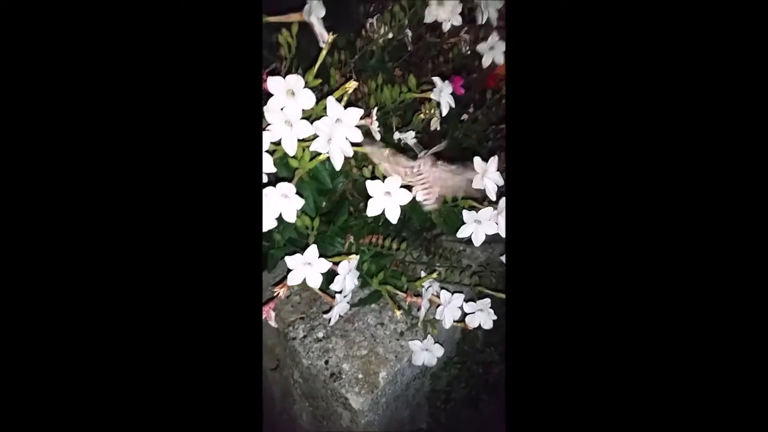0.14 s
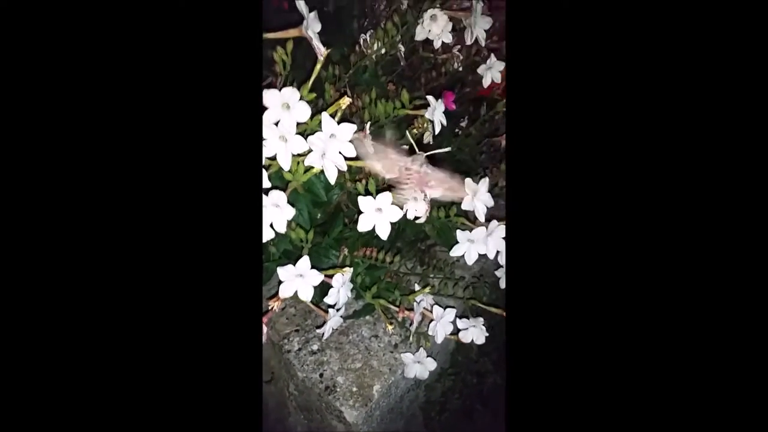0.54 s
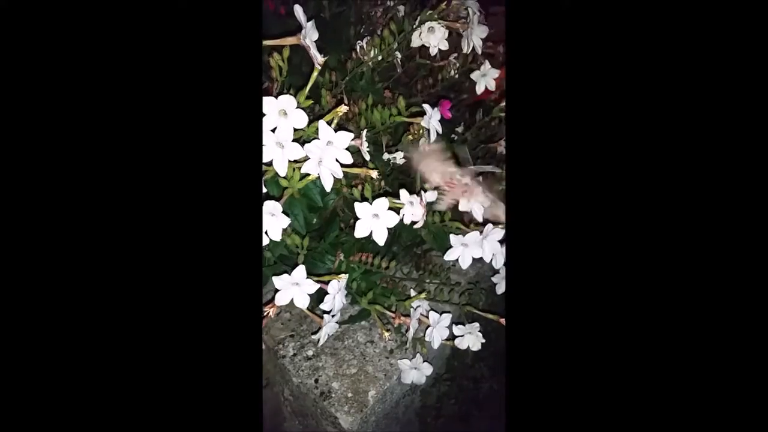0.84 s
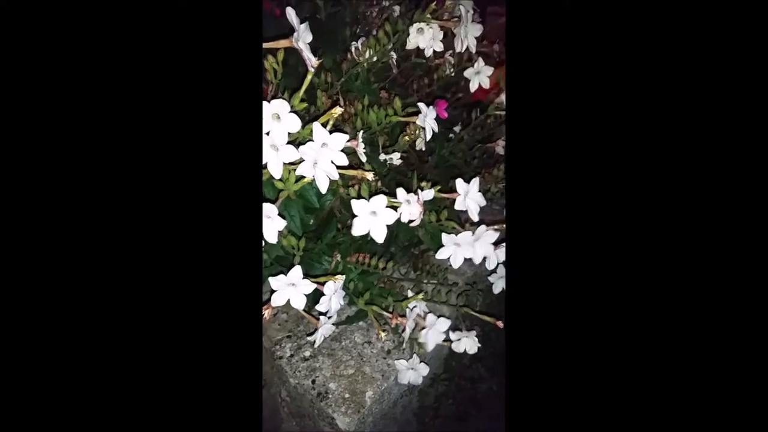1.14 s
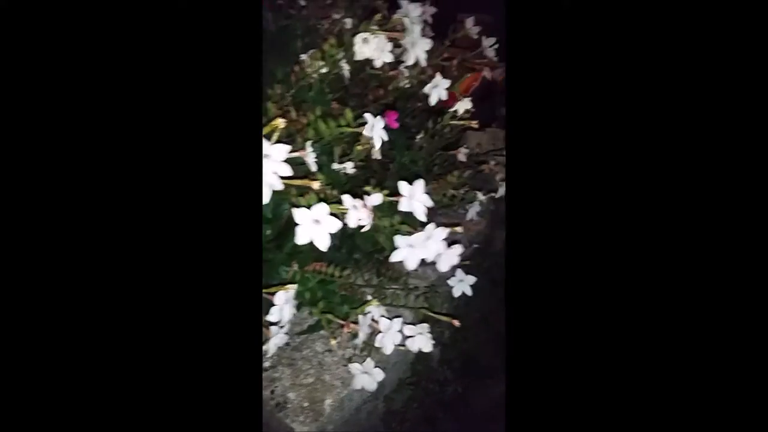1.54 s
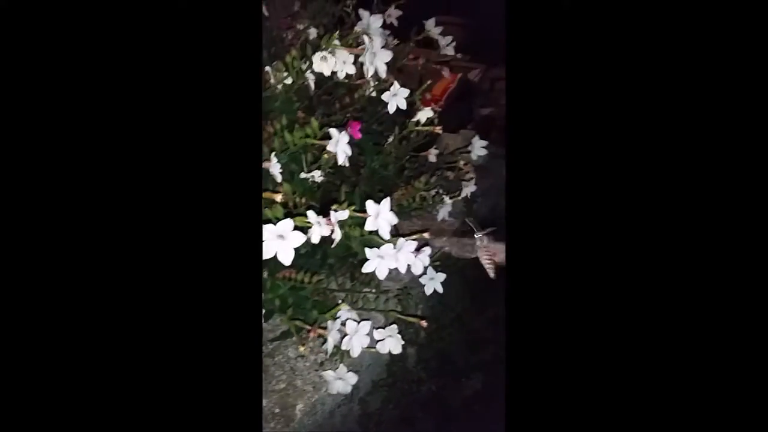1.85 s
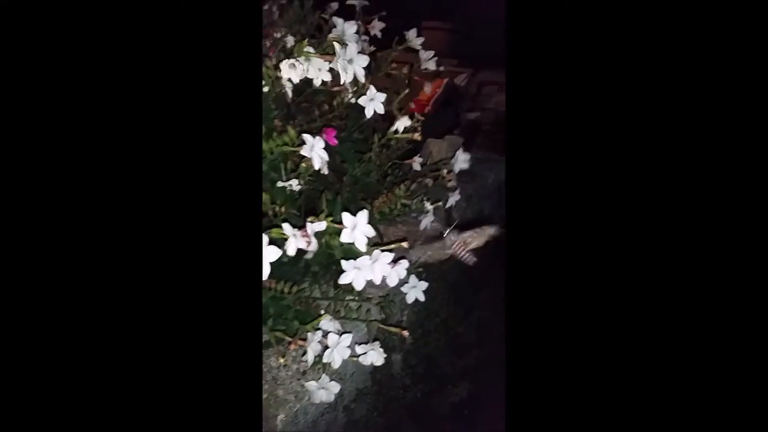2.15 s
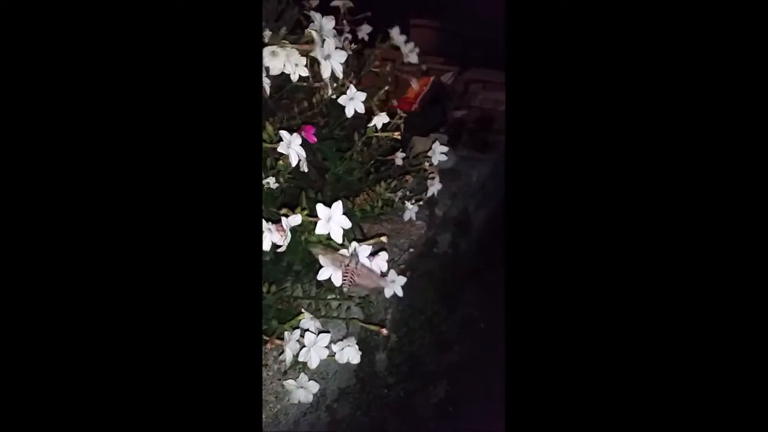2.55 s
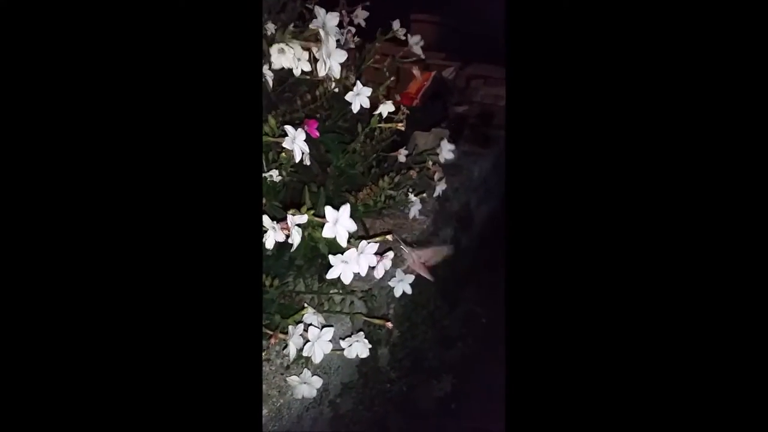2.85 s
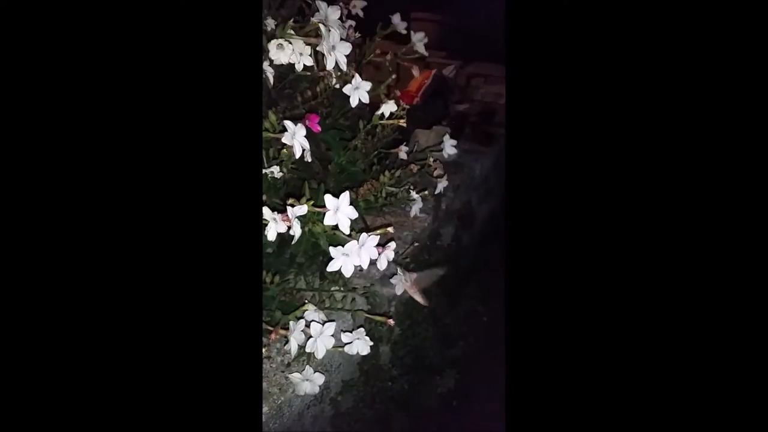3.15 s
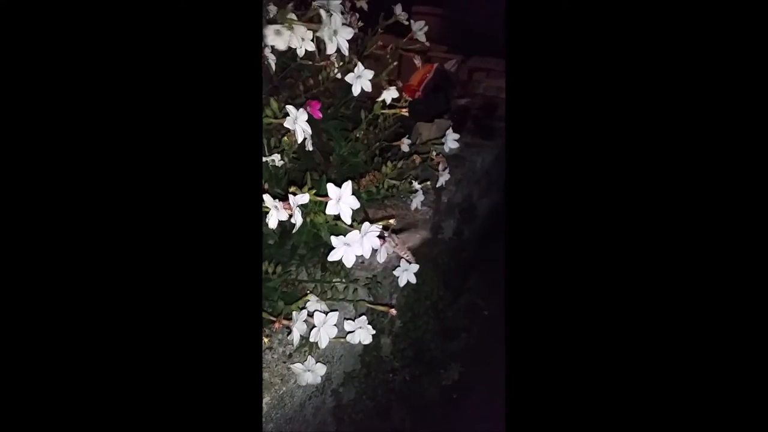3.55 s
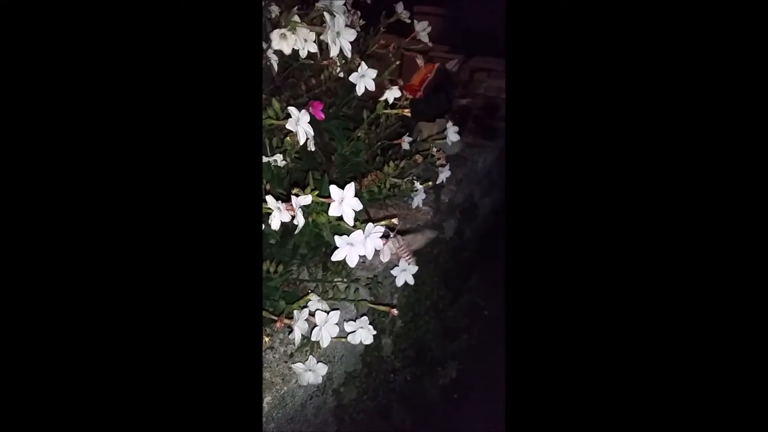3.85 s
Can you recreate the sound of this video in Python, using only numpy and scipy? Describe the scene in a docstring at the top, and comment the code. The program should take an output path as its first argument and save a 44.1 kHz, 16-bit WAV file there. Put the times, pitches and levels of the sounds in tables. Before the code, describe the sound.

Wind buffets an outdoor microphone, mainly on the left: soft low puffs and fluttering rumble until about 1.4 s, then heavy muffled thumps to 2.5 s, a brief lull, and more from 3.1 s to the end. Faint two-part bush-cricket rasps pulse about six times a second, with thin high lisps on the left. A small dry click falls right at 0.58 s. Distant crickets and night air stay very quiet.

```python
"""Light air buffets a microphone in a flower bed at night: low puffs of noise and sharp slaps, mostly at
its left port, over a fluttering draught. Bush crickets rasp two-syllable chirps near 11 kHz and another
insect lisps higher up on the left, both as file teeth ticking into a wing resonance. One small dry click
of short noise bursts falls on the right. Far off, shaped noise gives a steady cricket chorus near 4 kHz,
a band of distant rasping and the soft night air."""
import sys
import numpy as np
from scipy import signal
from scipy.fft import rfft, irfft, next_fast_len
from scipy.io import wavfile
from scipy.ndimage import map_coordinates

SR = 44100
rng = np.random.default_rng(int(sys.argv[2]) if len(sys.argv) > 2 else 0)


def generate_wav(signal):
    """Clip the signal to [-1, 1] and save it as 16-bit WAV at the path in sys.argv[1]."""
    frames = np.transpose(np.atleast_2d(signal))
    scaled = np.clip(frames, -1, 1) * 32767
    pcm = np.round(scaled).astype(np.int16)
    wavfile.write(sys.argv[1], SR, pcm)


N = 176400
T = np.arange(N) / SR


def amp(db):
    """Decibels to linear gain."""
    return 10 ** (np.asarray(db) / 20)


def unit(x):
    """x scaled to an RMS of 1 along its last axis."""
    return x / np.sqrt(np.mean(x ** 2, axis=-1, keepdims=True) + 1e-30)


def along(points, hz):
    """Values read from (frequency, value) points on a log frequency axis."""
    point_hz, value = np.transpose(points)
    return np.interp(np.log(hz + 1), np.log(point_hz + 1), value)


def filtered(x, response):
    """x through a zero-phase filter given as a gain for each frequency."""
    n = x.shape[-1]
    padded = next_fast_len(n + n // 2)
    gain = response(np.fft.rfftfreq(padded, 1 / SR))
    return irfft(rfft(x, padded) * gain, padded)[..., :n]


def coloured(x, spectrum):
    """x through a spectrum of (freq_hz, level_db) points."""
    return filtered(x, lambda hz: amp(along(spectrum, hz)))


def wobble(rate):
    """A smooth random curve for each channel, with rate knots a second."""
    return np.array([map_coordinates(knots, [T * rate]) for knots in rng.standard_normal((2, 1024))])


def pan(db):
    """Left and right gains of mean power 1, db being left minus right."""
    return unit(amp([db / 2, -db / 2]))[:, None]


def around():
    """A short time axis centred on an event, in seconds."""
    return np.arange(-4096, 4096) / SR


def sized(x, db, length):
    """x with the energy of a tone of that amplitude and length."""
    return x * amp(db) * np.sqrt(length * SR / 2 / (np.sum(x ** 2) + 1e-30))


def add(out, x, s):
    """Mix x into out, centred at time s."""
    first = round(s * SR) - x.shape[-1] // 2
    a, b = max(first, 0), min(first + x.shape[-1], N)
    if b > a:
        out[..., a:b] += x[..., a - first:b - first]


# Puffs of air at each port of the microphone: start_s, length_s, level_db, cutoff_hz
LEFT_PUFFS = [(.173, .051, -21, 90.6), (.265, .038, -15.5, 157), (.312, .02, -20, 89),
              (.435, .025, -17, 127), (.504, .021, -18, 95), (.536, .066, -20, 124),
              (.615, .013, -16, 96.4), (.728, .026, -20, 94.5), (.95, .035, -23.5, 79.5),
              (1.285, .017, -18, 126), (1.435, 0.0641, -12.5, 97), (1.568, .065, -14, 130),
              (1.668, .03, -13, 145), (1.76, .085, -19.5, 102.5), (1.93, .044, -17, 159),
              (2.085, .037, -11.5, 127), (2.205, .055, -16, 152), (2.286, .045, -9.5, 142),
              (2.55, .09, -17.5, 89), (2.87, .026, -15.5, 96), (3.455, .015, -13.5, 134.4),
              (3.512, .055, -13.5, 158), (3.596, .062, -11.5, 139), (3.69, .03, -15.5, 150.7),
              (3.958, .03, -21, 173)]
RIGHT_PUFFS = [(.771, 0.034, -29, 108), (3.315, 0.029, -22, 173), (3.371, 0.031, -24, 179),
               (3.442, 0.016, -23.5, 174), (3.513, 0.043, -29, 175), (3.652, 0.025, -19.5, 229)]
PUFF_LOW_HZ, PUFF_TOP_HZ = 51.6, 750  # low cut in puffs, upper limit of the turbulence in puffs and wisps
PUFF_STEEP = 3.6  # order of the roll-off above cutoff_hz
PUFF_EDGE_S = 0.0055  # softness of a puff's start and end
PUFF_SPREAD = 1.21  # energy is reckoned over this multiple of the length


def puffs(rows):
    """Each eddy shoves one port with a few cycles of low turbulence."""
    out, t = np.zeros(N), around()
    for start_s, length_s, level_db, cutoff_hz in rows:
        gate = .5 + .5 * np.tanh((length_s / 2 - abs(t)) / PUFF_EDGE_S)

        def port(hz):
            low_cut = hz ** 4 + PUFF_LOW_HZ ** 4
            high_cut = 1 + (hz / cutoff_hz) ** (2 * PUFF_STEEP)
            return hz ** 2 / np.sqrt(low_cut * high_cut) * np.exp(-(hz / PUFF_TOP_HZ) ** 2)

        push = gate * filtered(rng.standard_normal(len(t)), port)
        add(out, sized(push, level_db, length_s * PUFF_SPREAD), start_s + length_s / 2)
    return out


# Sharp slaps of air at each port: time_s, level_db (peak of the push), cutoff_hz
LEFT_SLAPS = [(1.435, -7, 83.5), (1.475, -10, 127), (1.586, -3.5, 127.4), (1.641, -5.5, 150),
              (1.655, -13, 155), (1.704, -5, 153), (1.768, -12, 92.6), (1.923, -3.5, 105),
              (2.077, -5.5, 125), (2.235, -1.5, 160), (2.304, -6, 196), (2.327, -6.5, 120),
              (2.351, -8, 245), (2.53, -6, 80), (3.126, -6, 175), (3.3, -6, 88), (3.427, -15.5, 195),
              (3.511, -6, 145.3), (3.608, -7, 175), (3.621, -17, 290), (3.644, -7, 135),
              (3.969, -10.5, 175), (3.985, -7.5, 144)]
RIGHT_SLAPS = [(.046, -18.5, 292), (1.452, -21, 290), (3.303, -27.5, 403)]
SLAP_STEEP, PORT_LOW_HZ = 1.31, 64  # roll-off exponent, the port's low cut
WISP_SHARE, WISP_S, WISP_HZ = 0.036, 0.01, 330  # share of the push, its life, its colour


def slaps(rows):
    """A small fast eddy pushes once, the port's low cut swings back slower, a wisp of turbulence trails."""
    out, t = np.zeros(N), around()
    low_cut = signal.butter(3, PORT_LOW_HZ, "highpass", fs=SR, output="sos")
    trail = np.exp(-abs(t) / np.where(t < 0, WISP_S / 2, WISP_S))  # rises faster than it dies

    def wisp_colour(hz):
        return hz * np.exp(-2 * hz / WISP_HZ - (hz / PUFF_TOP_HZ) ** 2)

    for time_s, level_db, cutoff_hz in rows:
        impulse = 1. * (t == 0)
        shove = filtered(impulse, lambda hz: np.exp(-(hz / cutoff_hz) ** SLAP_STEEP))
        push = signal.sosfilt(low_cut, shove)
        wisp = unit(filtered(rng.standard_normal(len(t)), wisp_colour))
        add(out, amp(level_db) * (push / abs(push).max() + WISP_SHARE * trail * wisp), time_s)
    return out


# Draught between the puffs: time_s, left_db, right_db
DRAUGHT = [(0, -32, -54), (0.091, -35.5, -48), (0.17, -28.5, -45.5), (0.548, -28.5, -34.5),
           (.68, -30.5, -41), (.86, -37.5, -36), (1.0, -27.5, -50.5), (1.222, -31.5, -28),
           (1.361, -36.5, -44.5), (1.498, -27.5, -30.5), (1.681, -23.5, -41.5), (2.019, -25, -40),
           (2.601, -23.5, -46), (2.799, -34, -47), (3.199, -24.5, -32.5), (3.42, -29, -25.5),
           (3.6, -16.5, -28.5), (3.88, -30, -44)]
# Colour of its small eddies: freq_hz, relative_db (per Hz)
EDDIES = [(15, -8.5), (35, -3), (65, 3.5), (100, 1), (160, -10), (250, -23), (450, -46.5), (900, -52),
          (2500, -100)]


def draught(flutter_db=3, flutter_hz=26):
    """A fluttering low rumble, unrelated from port to port."""
    time_s, *ports = np.transpose(DRAUGHT)
    level_db = np.array([np.interp(T, time_s, port_db) for port_db in ports])
    rumble = coloured(rng.standard_normal((2, N)), EDDIES)
    return amp(level_db) * unit(amp(flutter_db * wobble(flutter_hz)) * rumble)


STROKE_SWELL, STROKE_FADE = 2.4, .7  # exponents: how the force builds and lets go
STROKE_SLOWING, STROKE_CENTRE = .4, .66  # how the wing slows, share of the stroke before its listed time
TOOTH_SCATTER, TOOTH_DB = 0.053, 3.5  # uneven spacing in teeth, uneven strength in dB


def stroke(length, tooth_hz, wing, db):
    """File teeth tick into the wing's resonance, ever harder and slower, then let go."""
    t = around()
    teeth_passed = tooth_hz * length
    scatter, size = rng.standard_normal((2, 128))
    travel = np.clip((np.arange(len(size)) + TOOTH_SCATTER * scatter) / teeth_passed, 0, 1)
    phase = travel * (1 + STROKE_SLOWING * (travel - 1))
    # teeth beyond the end of the stroke get no force
    force = travel ** STROKE_SWELL * (1 - travel) ** STROKE_FADE * amp(TOOTH_DB * size)
    sample = np.searchsorted(t, (phase - STROKE_CENTRE) * length)
    teeth = np.bincount(np.clip(sample, 0, len(t) - 1), force, len(t))
    return sized(coloured(teeth, wing), db, length)


LEAF_SHARE, LEAF_T60_S = .75, 0.033  # scattered over direct sound, decay time by 60 dB


def foliage(x):
    """Leaves scatter a stroke into a short diffuse tail, different at each port."""
    t = around()
    decay = (t >= 0) * amp(-60 * abs(t) / LEAF_T60_S)
    tail = unit(rng.standard_normal((2, len(t))) * decay) / np.sqrt(len(t))
    scattered = signal.fftconvolve(np.array([x, x]), tail, "same", axes=1)
    return (x + LEAF_SHARE * scattered) / np.hypot(1, LEAF_SHARE)


# Bush cricket chirps: time_s, first_syllable_db, second_syllable_db, pan_db (left minus right)
CHIRPS = [(0.012, -62, -53.5, -11), (0.164, -60, -59.5, -7), (0.319, -63.5, -63.5, 7.5),
          (0.482, -59.5, -56, -10.5), (0.623, -63, -57.5, 9), (0.79, -62, -66.5, -4.5),
          (0.942, -56, -58.5, 11), (1.11, -69, -66.5, -1), (1.27, -73, -68, -5),
          (1.437, -66.5, -57.5, -3.5), (1.59, -70, -64.5, -8.5), (1.743, -68, -81, 3),
          (1.905, -66, -60, -15), (2.067, -61.5, -57, -3), (2.226, -66.5, -61, -4.5),
          (2.389, -68, -71.5, -1.5), (2.537, -64, -61, 0.5), (2.698, -59.5, -56, 4), (2.855, -59, -61, -5),
          (3.018, -63, -61.5, -8), (3.178, -63.5, -65.5, -6), (3.318, -63, -58, 9),
          (3.495, -59, -58.5, -12), (3.638, -64, -61, 10.5), (3.79, -73, -68.5, 2), (3.944, -77, -66, 17)]
# Resonance of the bush cricket's wing: freq_hz, relative_db
WING = [(8500, -47.5), (9600, -23.5), (10300, -3.5), (10900, 2.5), (11600, -1), (12200, -23), (13500, -29),
        (16000, -45.5)]
SYLLABLE_GAP_S, SYLLABLE_S = .047, .056  # from one syllable to the next, length of each
TOOTH_HZ, TOOTH_DRIFT = 262, 0.12  # typical tooth rate, log spread of stroke speed


def bush_crickets():
    """Two wing strokes make a chirp; no two run at quite the same speed."""
    out = np.zeros((2, N))
    for time_s, first_db, second_db, pan_db in CHIRPS:
        for k, level_db in enumerate((first_db, second_db)):
            tooth_hz = TOOTH_HZ * np.exp(TOOTH_DRIFT * rng.standard_normal())
            syllable = foliage(stroke(SYLLABLE_S, tooth_hz, WING, level_db))
            add(out, pan(pan_db) * syllable, time_s + k * SYLLABLE_GAP_S)
    return out


# Lisps of a higher insect: time_s, level_db (at the left port)
LISPS = [(0.709, -64), (0.869, -60.5), (1.079, -64), (1.241, -63), (1.842, -69), (1.892, -62),
         (2.001, -65.5), (2.051, -64), (2.162, -63), (2.481, -64.5), (2.642, -61), (2.802, -60.5),
         (2.969, -59.5), (3.011, -56), (3.13, -58.5), (3.179, -58), (3.3, -62), (3.339, -59.5),
         (3.461, -59.5), (3.78, -62), (3.839, -58), (3.943, -57.5), (3.99, -59)]
# Resonance of its wing: freq_hz, relative_db
LISP_WING = [(9500, -44.5), (10800, -11.5), (11600, 5), (12700, -5.5), (13800, -12.5), (15500, -11)]
LISP_S, LISP_TOOTH_HZ, LISP_PAN_DB = 0.049, 900, 19  # stroke length, tooth rate, left over right


def lisping_insect():
    """Short single wing strokes with dense teeth, on the left."""
    out = np.zeros(N)
    for time_s, level_db in LISPS:
        add(out, stroke(LISP_S, LISP_TOOTH_HZ, LISP_WING, level_db), time_s)
    return out * amp([[0], [-LISP_PAN_DB]])


# A light touch and two contacts: time_s, level_db, t60_s
CLICK = [(0.5744, -47, .01), (0.5784, -34, 0.0064), (0.5809, -41, 0.0097)]
# Colour of the touched thing: freq_hz, relative_db
CLICK_BODY = [(100, 11), (350, 24.5), (700, 16.5), (1050, 17), (1600, 0.5), (2300, -4), (2900, -9.5),
              (4200, 1.5), (7000, -7.5), (8500, -19), (11000, -10), (15500, -8.5)]
CLICK_PAN_DB, CLICK_SNAP = -23, 3.4  # left minus right, first jolt over the scratch that follows


def click():
    """Something small touches and snaps dryly near the right port: jolts, each with a dying scratch."""
    out, t = np.zeros(N), around()
    for time_s, level_db, t60_s in CLICK:
        scratch = rng.standard_normal(len(t)) * (t >= 0) * amp(-60 * abs(t) / t60_s)
        snap = CLICK_SNAP * (t == 0) + scratch
        add(out, sized(coloured(snap, CLICK_BODY), level_db, t60_s / 2), time_s)
    return pan(CLICK_PAN_DB) * out


def bed(spectrum, level_db, shimmer_db, rate):
    """Noise shaped into a slightly shimmering band, unrelated from port to port."""
    band = coloured(rng.standard_normal((2, N)), spectrum)
    return amp(level_db)[:, None] * unit(band * amp(shimmer_db * wobble(rate)))


# Far cricket chorus: freq_hz, relative_db (per Hz); then its left_db, right_db
CHORUS = [(2500, -41), (3200, -20.5), (3600, -2.5), (4000, 2), (4500, 0), (4900, -9.5), (5400, -39),
          (7000, -44.5), (9000, -46)]
CHORUS_DB = (-65, -72.5)


def far_chorus():
    """Many far crickets merge into a steady band near 4 kHz."""
    return bed(CHORUS, CHORUS_DB, shimmer_db=1.1, rate=85)


# Distant rasping: freq_hz, relative_db (per Hz); then its left_db, right_db
FAR_RASP = [(8500, -32), (9700, -14.5), (10500, 3), (11500, -4), (12500, 0), (13800, -6), (15500, -1.5)]
FAR_RASP_DB = (-63.5, -65)


def far_rasp():
    """Many far rasps merge into a high band that swells and sinks irregularly."""
    return bed(FAR_RASP, FAR_RASP_DB, shimmer_db=2.4, rate=9.4)


# Night air: freq_hz, relative_db (per Hz); then its left_db, right_db
NIGHT_AIR = [(20, -6), (150, 11.5), (400, 6.5), (700, 2.5), (1100, -1.5), (1500, -7.5), (2000, -11.5),
             (2800, -20), (5000, -21.5), (6500, -30.5), (8000, -35.5), (16000, -41)]
NIGHT_AIR_DB = (-54, -55.5)


def night_air():
    """A soft broad noise, strongest in the low range and almost steady."""
    return bed(NIGHT_AIR, NIGHT_AIR_DB, shimmer_db=.4, rate=9)


def scene():
    """Air at the two ports, the near insects and the click, over the far beds."""
    left_wind = puffs(LEFT_PUFFS) + slaps(LEFT_SLAPS)
    right_wind = puffs(RIGHT_PUFFS) + slaps(RIGHT_SLAPS)
    wind = np.array([left_wind, right_wind]) + draught()
    near = bush_crickets() + lisping_insect() + click()
    far = far_chorus() + far_rasp() + night_air()
    return wind + near + far


TOP_HZ = 15830  # band limit, reached by a 60 Hz wide slope


def record(dry):
    """Nothing is kept above the band limit."""
    return filtered(dry, lambda hz: np.clip((TOP_HZ - hz) / 60, 0, 1))


dry = scene()
out = record(dry)
generate_wav(out)
```